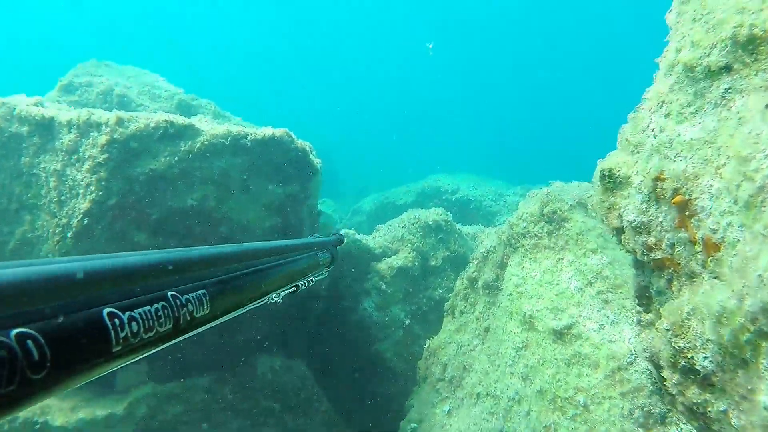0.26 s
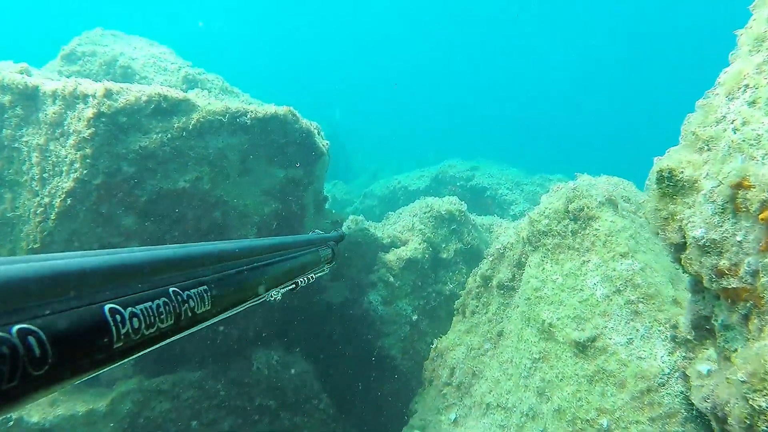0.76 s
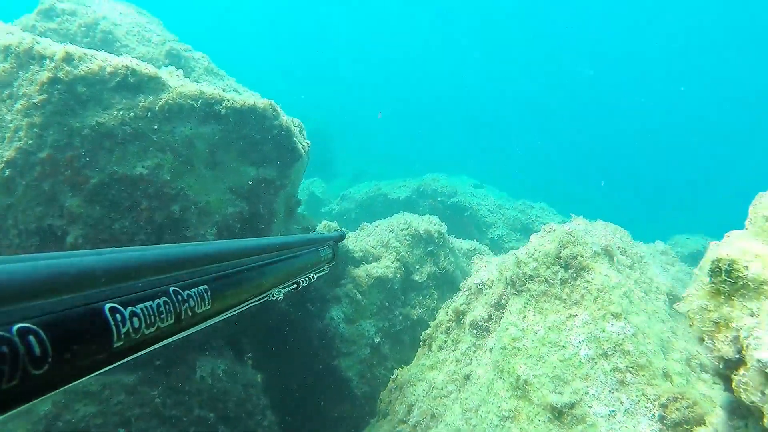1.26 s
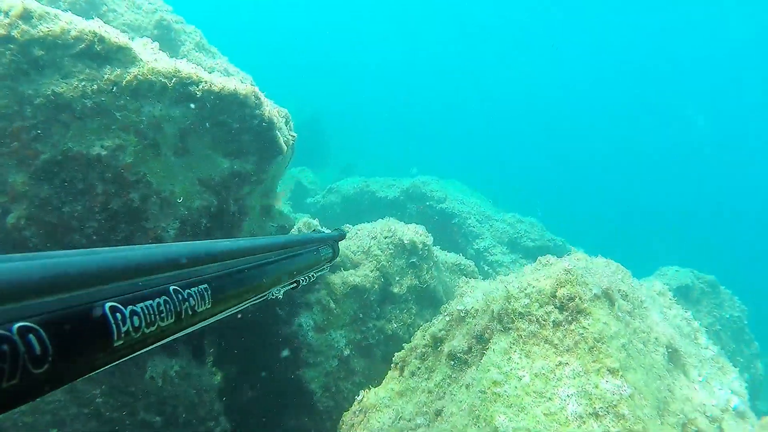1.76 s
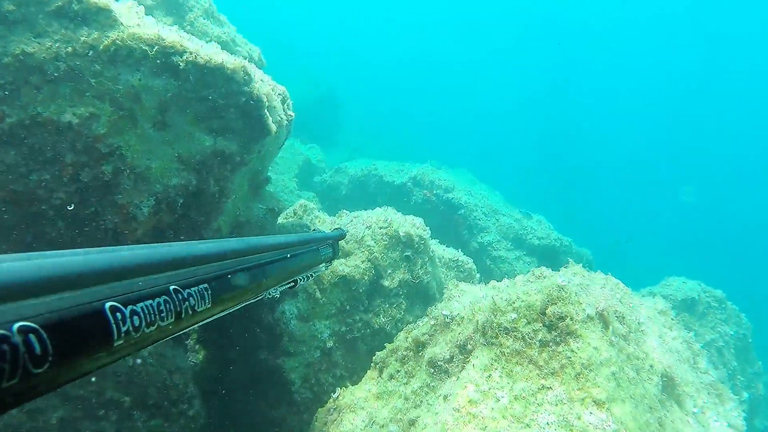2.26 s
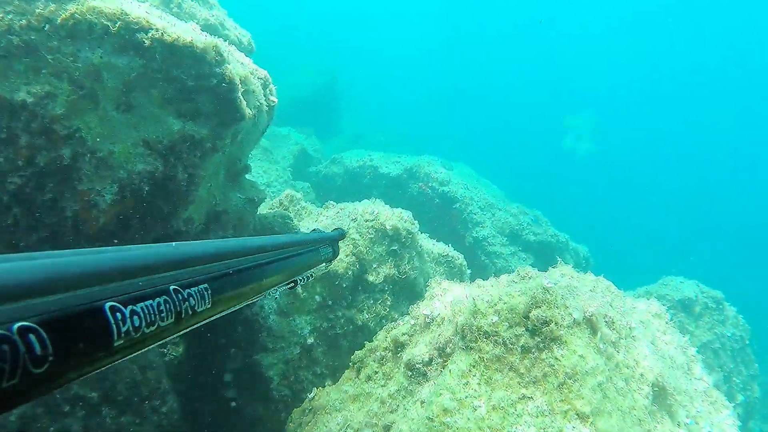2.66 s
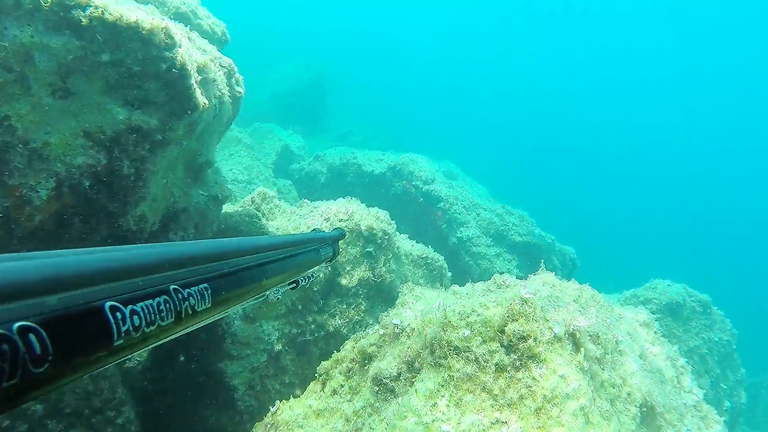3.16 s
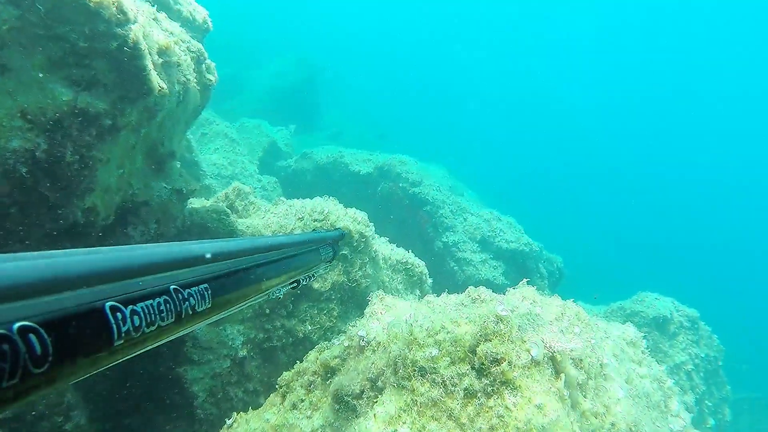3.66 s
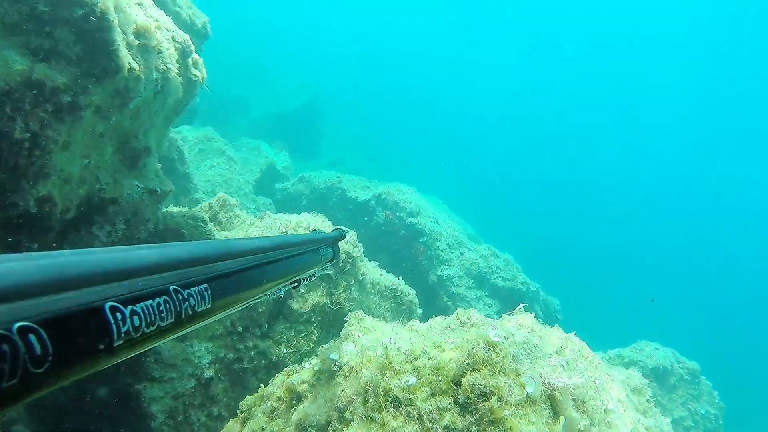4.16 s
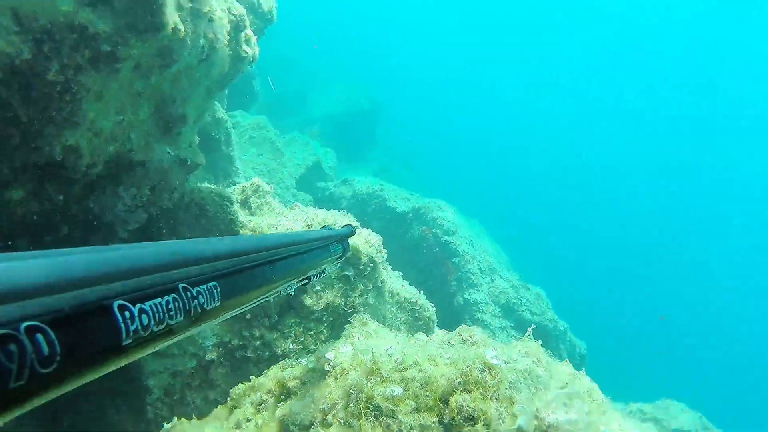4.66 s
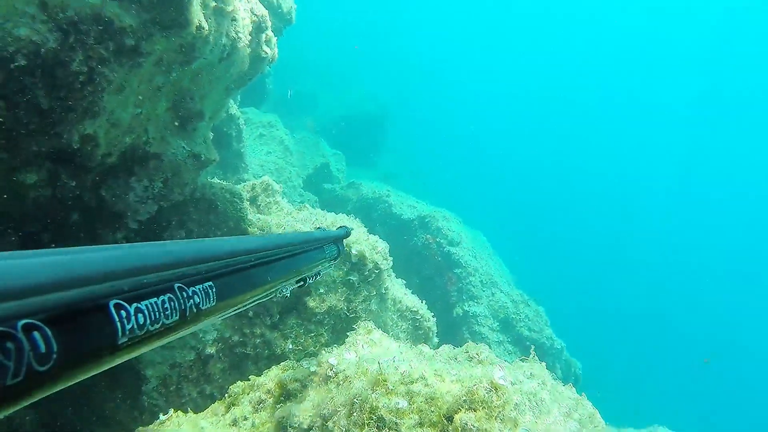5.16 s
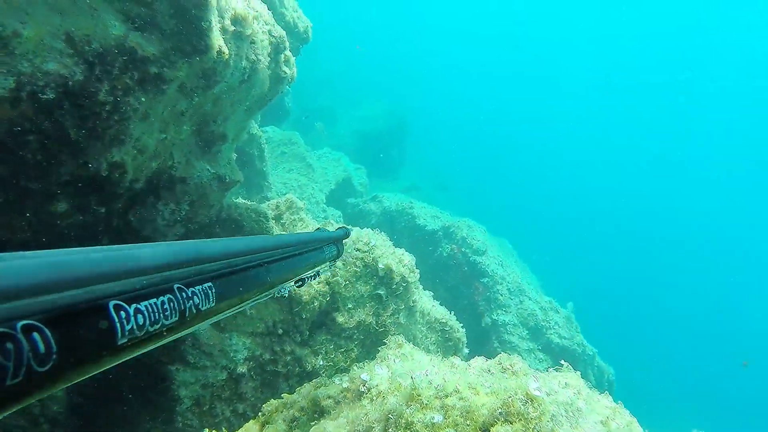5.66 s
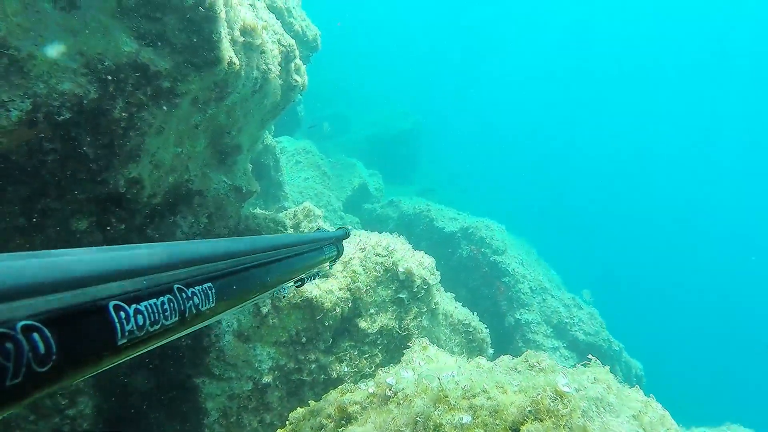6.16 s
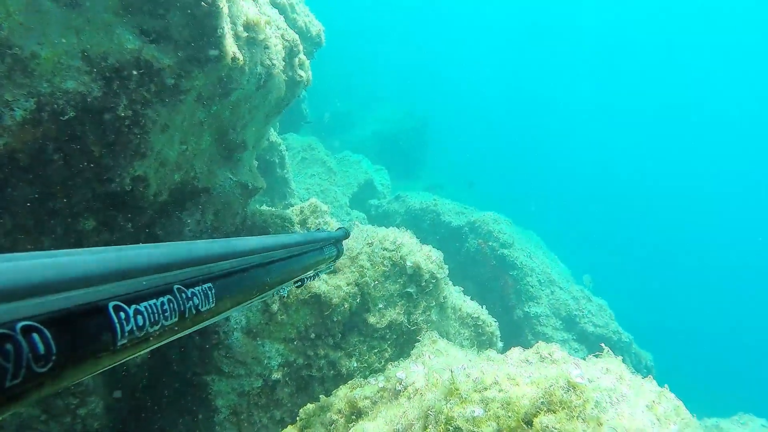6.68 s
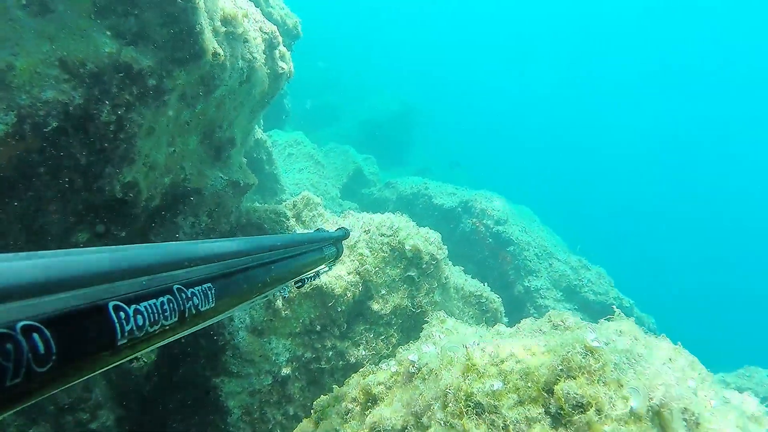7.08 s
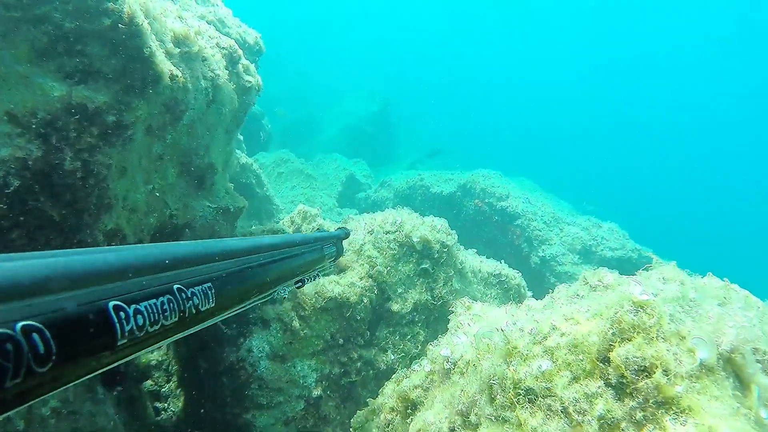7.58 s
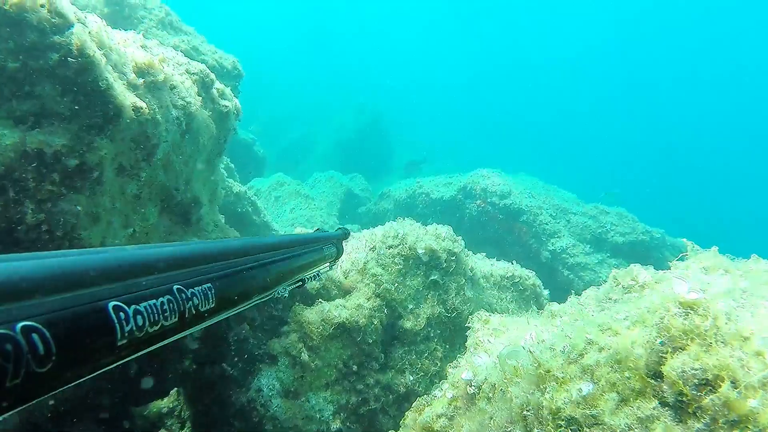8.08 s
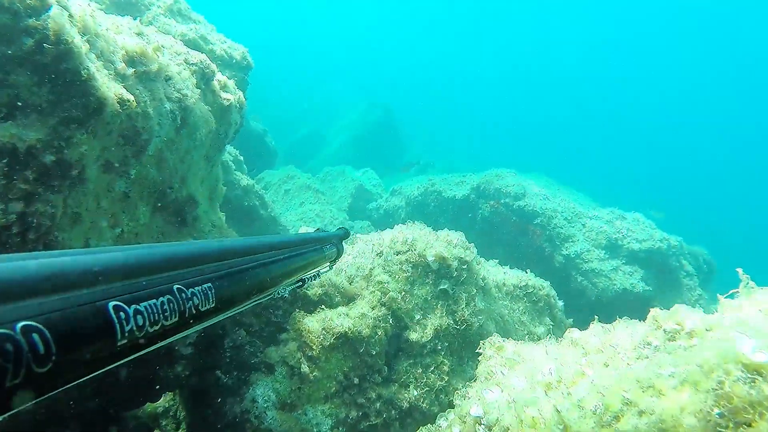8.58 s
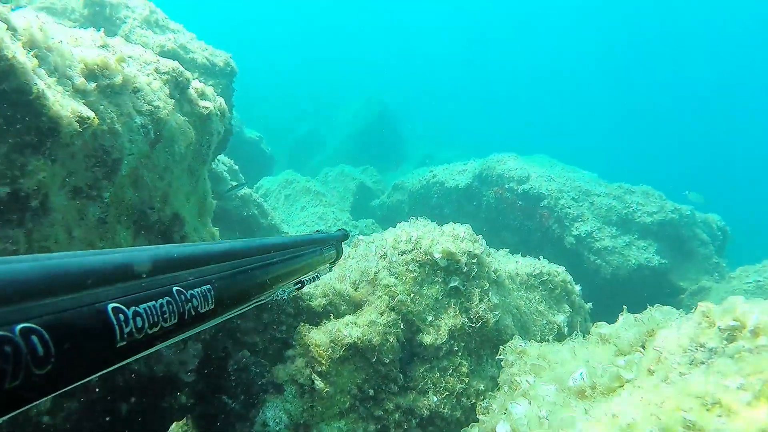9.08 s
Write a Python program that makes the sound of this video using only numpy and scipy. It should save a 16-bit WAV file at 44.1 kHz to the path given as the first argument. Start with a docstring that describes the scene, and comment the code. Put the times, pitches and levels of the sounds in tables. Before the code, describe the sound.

The sound is close and boxy, from a camera sealed in a housing underwater among rocks. A quiet, low, slightly wavering hum and soft background noise run throughout, beneath the continuous fine frying of distant shrimp. From 0.2 to 0.9 seconds, gear taps and rubs the case, a low surge of water swells at about 0.3, and faint bubbles flurry. A very loud, dry shrimp snap cracks at 1.3. Smaller snaps scatter irregularly onward, with little bubble gulps around 0.9 to 1.8, 2.5 and 3.2 to 3.9. A gentle rumble and faint rub come near 4. At 4.75 a heavy bump hits, followed at 4.83 by another with a gritty scratch, leaving a brief deep wobble. From 5 to 9.3 crackle and sharp snaps continue, with round bubble blips near 6.2 and 7.4, very faint taps after 7.6, and the hum's upper tones weakening.

```python
"""Under water among rocks, heard from inside a diver's sealed camera housing.
Snapping shrimp crackle near and far: each snap is a spike with scatter and echoes, coloured by the case.
The camera hums as a few wavering sines, water rumbles as swelling noise and small bubbles ring.
The diver's gear taps and rubs on the housing, exciting its modes; later two heavy bumps sway the camera."""
import sys
import numpy as np
from scipy import signal
from scipy.fft import rfft, irfft, next_fast_len
from scipy.io import wavfile
from scipy.ndimage import map_coordinates

SR = 44100
rng = np.random.default_rng(int(sys.argv[2]) if len(sys.argv) > 2 else 0)


def persist_wave(psi):
    """Save psi, clipped to +-1, as 16-bit WAV."""
    counts = np.round(np.clip(psi, -1, 1) * 32767).astype(np.int16)
    wavfile.write(sys.argv[1], SR, np.atleast_2d(counts).T)


N = 411453


def amp(db):
    """Amplitude factor of a level in dB."""
    return 10 ** (np.asarray(db) / 20)


def unit(x):
    """x scaled to rms 1."""
    return x / np.sqrt(np.mean(x ** 2) + 1e-20)


def along(points, hz):
    """Values at hz, interpolated between (Hz, value) points on a log axis."""
    f, v = np.transpose(points)
    return np.interp(np.log(hz + 1), np.log(f + 1), v)


def curve(rows):
    """One value per sample from (seconds, value) rows."""
    return np.interp(np.arange(N) / SR, *np.transpose(rows))


def wobble(rate):
    """A smooth random curve, rate knots a second."""
    knots = rng.standard_normal(int(N * rate / SR) + 4)
    return map_coordinates(knots, [np.arange(N) * rate / SR])


def filtered(x, response):
    """x with its spectrum multiplied by a response of frequency."""
    size = next_fast_len(len(x) + SR // 10)
    hz = np.fft.rfftfreq(size, 1 / SR)
    return irfft(rfft(x, size) * response(hz), size)[:len(x)]


def noise(spectrum):
    """Coloured noise of rms 1."""
    return unit(filtered(rng.standard_normal(N), lambda hz: amp(along(spectrum, hz))))


def add(track, s, sound):
    """Mix a sound into the track at s seconds."""
    part = track[max(round(s * SR), 0):][:len(sound)]
    part += sound[:len(part)]


def ticks(rate, spread_db, limit_db):
    """Random impulses, rate a second: many weak ones, few strong, those over the limit left out."""
    size_db = spread_db * rng.exponential(size=N)
    present = (rng.random(N) < rate / SR) * (size_db < limit_db)
    return present * amp(size_db) * rng.choice([-1, 1], N)


def gestures(rows, rise_db_per_s, fall_db_per_s, rest_db=-120):
    """Gain of (start, length, dB) gestures that rise ahead of the start, hold and fall, over a resting level."""
    t = np.arange(N) / SR
    power = amp(rest_db) ** 2
    for s, length, db in rows:
        before, after = np.maximum(s - t, 0), np.maximum(t - s - length, 0)
        power = power + amp(db - rise_db_per_s * before - fall_db_per_s * after) ** 2
    return np.sqrt(power)


def water(calm_db=-56.5, push_db_per_s=124, settle_db_per_s=35, floor_db=-54):
    """Rumbling noise that swells as the diver's movements push water on the housing, over steady noise."""
    # Each row: start in seconds, length in seconds, rumble level in dB.
    moves = [(0, .08, -42.5), (.27, 0.055, -28), (1.1, .1, -49), (2.17, 0.14, -48), (4.05, 0.24, -44.5),
             (4.68, .06, -38.5), (6.42, .06, -51.5), (7.28, .06, -56)]
    # Spectrum of the rumble against the housing. Each row: frequency in Hz, relative level in dB per Hz.
    rumble = [(8, -11), (20, 4), (36, -11), (55, -5), (80, -25), (200, -31), (500, -44), (1500, -92)]
    # Spectrum of the steady background. Each row: frequency in Hz, relative level in dB per Hz.
    background = [(20, 2), (60, -2.5), (110, 0.5), (170, -5.5), (260, -1.5), (340, -8), (520, -11),
                  (780, -12.5), (1200, -20), (2600, -29.5), (5000, -23), (9000, -29.5), (15000, -33.5)]
    swell = gestures(moves, push_db_per_s, settle_db_per_s, calm_db)
    return swell * noise(rumble) + amp(floor_db) * noise(background)


def hum(waver_db=0.5, drift_radians=0.12):
    """The camera's hum: sine lines, each wavering a little in level and phase."""
    # Lines of the hum, the lowest first. Each row: frequency in Hz, rms level in dB before the changes below.
    lines = [(111.7, -55), (195.5, -82), (223.4, -58), (249.4, -58), (275.4, -58.5), (446.6, -80),
             (13906, -94)]
    # Level change shared by all but the lowest line. Each row: time in seconds, change in dB.
    overtones = [(0, 0.5), (4.5, 1.7), (6, -2), (7.5, -5), (9.3, -2)]
    t, upper_db = np.arange(N) / SR, curve(overtones)
    out = np.zeros(N)
    for k, (hz, db) in enumerate(lines):
        level_db = db + (k > 0) * upper_db + waver_db * wobble(2.08)
        phase = 2 * np.pi * (hz * t + rng.random()) + drift_radians * wobble(2.68)
        out += np.sqrt(2) * amp(level_db) * np.sin(phase)
    return out


def case_response(size=4096):
    """What a pressure spike in the water becomes inside the case: a causal colour plus wall resonances."""
    # Colour of a snap through the case. Each row: frequency in Hz, relative level in dB.
    colour = [(200, -39), (500, -16), (800, -5), (1250, -14), (1900, -10.5), (2600, 0), (3400, -5.5),
              (4200, -6), (4650, -11), (5700, -14), (8500, -20.5), (9800, -21), (11300, -29), (12400, -25),
              (15000, -39.5)]
    # Narrow rings of the case wall. Each row: frequency in Hz, width in Hz, level in dB against the colour there.
    wall = [(1537, 69, 11.5), (5057, 150, 3.5), (2084, 125, -8.5)]
    hz = np.fft.rfftfreq(size, 1 / SR)
    # folding the cepstrum puts the energy as early as the colour allows
    cepstrum = irfft(np.log(amp(along(colour, hz))))
    causal = np.exp(rfft(2 * cepstrum[:size // 2], size))
    rings = sum(amp(db) * 1j * hz * width / (centre ** 2 - hz ** 2 + 1j * hz * width)
                for centre, width, db in wall)
    return irfft(causal * (1 + rings))[:size // 2]


def snap(case, treble_db, centre_hz, focus_db, rocks_db, scatter_db=0, rocks_t60=0.059, scatter_t60=0.0051,
         surface_db=-13, shelf_hz=5000, dull_hz=7000, focus_octaves=0.39):
    """A collapsing bubble: a spike, scatter close by, dull rock echoes and an inverted copy from the surface."""
    t = np.arange(len(case)) / SR
    scatter = rng.standard_normal(len(t)) * amp(-60 * t / scatter_t60) * (1 - np.exp(-t / 0.00042))
    rocks = rng.standard_normal(len(t)) ** 3 * amp(-60 * t / rocks_t60)  # cubed: a few echoes stand out
    direct = amp(scatter_db) * scatter / np.linalg.norm(scatter)
    direct[0] += 1
    direct[round(rng.uniform(.004, .018) * SR)] -= amp(surface_db)
    size = 2 * len(case)
    hz = np.fft.rfftfreq(size, 1 / SR)
    echoes = amp(rocks_db) * rfft(rocks / np.linalg.norm(rocks), size) / (1 + 1j * hz / dull_hz)
    # the claw and its crevice favour one band
    focus = np.exp(-.5 * (np.log2((hz + 1) / centre_hz) / focus_octaves) ** 2)
    treble_shelf = hz ** 4 / (hz ** 4 + shelf_hz ** 4)
    colour = amp(focus_db * focus + treble_db * treble_shelf)
    sound = irfft((rfft(direct, size) + echoes) * rfft(case, size) * colour)
    sound = np.roll(sound, SR // 1000)  # 1 ms later
    return sound / np.abs(sound).max()


def ticking(case, centre_hz, range_octaves, treble_db, spread_db, limit_db, count):
    """Shrimp in the middle distance, rms 1: separate snaps, each in a band of its own."""
    out = np.zeros(N)
    for when, size, band in rng.random((count, 3)):
        hz = centre_hz * 2 ** (range_octaves * (band - .5))
        db = min(-spread_db * np.log(1 - size), limit_db)
        add(out, when * N / SR, amp(db) * snap(case, treble_db, hz, focus_db=14, rocks_db=3.0))
    return unit(out)


def colony(case, rate=900, count=8):
    """Frying sound, rms 1: dense impulses from far patches of rock, each patch with its own echoes."""
    frying = np.zeros(N)
    for _ in range(count):
        impulses = ticks(rate / count, 3.7, 15)
        patch = unit(snap(case, -12.5, 2400, focus_db=5, rocks_db=8))
        frying += signal.oaconvolve(impulses, patch)[:N]
    return unit(frying)


def far_shrimp(case, lull_db=-55, volley_db_per_s=66):
    """Dull ticks of large shrimp and sharp ones of small shrimp over the frying of the far colony."""
    # Spells of louder crackle. Each row: start in seconds, length in seconds, gain in dB on the mix below.
    volleys = [(0, 0.41, -53), (.8, 0.084, -59.5), (1.25, 0.2, -56), (1.72, 0.065, -53), (2.42, 0.12, -56),
               (3.42, 0.47, -53), (4.25, 0.051, -53.5), (5.62, .15, -53), (6.4, 0.074, -54),
               (7.3, 0.14, -56.5), (8.35, 0.16, -58.5)]
    large = ticking(case, centre_hz=2810, range_octaves=1.5, treble_db=12.5, spread_db=5, limit_db=12, count=380)
    small = ticking(case, centre_hz=11500, range_octaves=1.42, treble_db=16.5, spread_db=5, limit_db=15, count=480)
    frying = colony(case) * amp(1.66 * wobble(17))
    mix = amp(-2) * large + amp(-10) * small + amp(-2.5) * frying
    return gestures(volleys, volley_db_per_s, volley_db_per_s, lull_db) * mix


def bubble(hz, cycles=6, rise=0.1):
    """A bubble rings, 30 dB down after the given cycles, its pitch creeping up."""
    t = np.arange(SR // 10) / SR
    age = t * hz / cycles
    ring = np.sin(2 * np.pi * hz * t * (1 + rise * age / 2))
    return amp(-60 * age / 2) * (1 - np.exp(-t * hz)) * ring


def bubbling(level_db=1, faint_hz=740, size_db=9, count=650, stray_db=-58, flurry_db_per_s=136):
    """A few clear gulps of water among many faint ringing bubbles that swell in flurries."""
    # Small bubbles and gulps. Each row: start in seconds, level in dB before level_db, starting pitch in Hz.
    clear = [(0.903, -34.5, 910), (1.119, -32.5, 810), (1.723, -36, 860), (1.823, -35, 770),
             (2.484, -42, 850), (3.204, -38, 690), (3.395, -37.5, 710), (3.881, -37, 450), (6.14, -38, 460),
             (6.31, -39, 600), (7.407, -36, 610), (7.455, -35, 810)]
    # Flurries of faint bubbles. Each row: start in seconds, length in seconds, gain in dB on the faint bubbles.
    flurries = [(.35, 0.073, -40), (3.8, 0.11, -47.5)]
    gulps, faint = np.zeros(N), np.zeros(N)
    for s, db, hz in clear:
        add(gulps, s, amp(db + level_db) * bubble(hz))
    for when, size, pitch in rng.random((count, 3)):
        hz = faint_hz * 2 ** (1.5 * (pitch - .5))
        add(faint, when * N / SR, amp(size_db * size ** 2) * bubble(hz, cycles=13))
    return gulps + gestures(flurries, flurry_db_per_s, flurry_db_per_s, stray_db) * faint


def near_shrimp(case, plain_treble_db=-22, wet_db=4, usual_db=-28, nearness=0.58):
    """Single loud snaps, each with its own colour; the louder, the nearer and drier."""
    # The nearest shrimp. Each row: start in seconds, peak in dB, treble in dB on a scale where
    # plain_treble_db leaves it as it is, favoured frequency in Hz.
    snaps = [(0.0592, -32, -20, 2850), (0.1056, -30.5, -18, 2540), (0.661, -29, -14, 2330),
             (0.822, -21, -27, 2780), (0.9817, -30.5, -22, 2560), (1.0499, -27, -21, 2570),
             (1.1445, -29, -43, 2790), (1.3315, -9.5, -13.5, 2220), (1.381, -31.5, -17, 2680),
             (1.5482, -29.5, -5, 2770), (1.602, -30, -16, 2540), (1.976, -28.5, -13, 2600),
             (2.2144, -26.5, -17, 3270), (2.24, -29.5, -3, 2800), (2.254, -22, -29, 2580),
             (2.472, -27.5, -22, 3730), (2.54, -29.5, -18, 3480), (2.6357, -21, 0.5, 2600),
             (2.917, -31.5, -10, 2550), (3.4665, -29, -8, 2600), (3.505, -31.5, -5, 3120),
             (3.5507, -23, -13, 2790), (3.644, -24.5, -5, 2500), (3.871, -27.5, -7, 2830),
             (4.149, -29, -1, 2800), (4.349, -23, -17, 3070), (4.5348, -26, -14, 2540),
             (4.9573, -30.5, 3, 2840), (5.135, -25, -28, 2660), (5.2006, -27, -9, 2260),
             (5.214, -23.5, -17, 2570), (5.339, -29.5, -7, 2580), (5.695, -28.5, -28, 2470),
             (5.9606, -29.5, -11, 2680), (6.1877, -25, -5, 2680), (6.2978, -26, -12, 2900),
             (6.398, -28, -18, 3660), (6.498, -24, -2, 2580), (6.5934, -27, 15, 3660),
             (6.6466, -22.5, -15, 2670), (6.774, -30.5, -8, 2590), (7.0626, -22, -25, 2100),
             (7.0983, -23.5, -25, 2880), (7.114, -29.5, -30, 2370), (7.1395, -27, -5, 3870),
             (7.3381, -32, -14, 2300), (7.454, -36, -13, 2540), (7.522, -26.5, -6, 3860),
             (8.1194, -25.5, -4, 2650), (8.3269, -29, -14, 2470), (8.521, -32, -36, 2650),
             (8.5547, -29, -8, 2640), (8.6857, -27, -17, 2590), (8.799, -23, -15, 2960),
             (9.192, -30.5, -33, 2420)]
    out = np.zeros(N)
    for s, db, treble_db, hz in snaps:
        rocks_db = wet_db - nearness * (db - usual_db)
        add(out, s, amp(db) * snap(case, treble_db - plain_treble_db, hz, focus_db=9, rocks_db=rocks_db))
    return out


def housing_ring(tilt_db, damping, vary_db=0.95, pivot_hz=850, swell_s=0.00049):
    """The housing's modes: a harder contact tilts them upward by tilt_db an octave, a lingering one damps them."""
    # Modes of the housing. Each row: frequency in Hz, level in dB before tilt and chance,
    # undamped time in seconds to fall 60 dB.
    housing = [(219, -29, 0.055), (295.5, -6.5, 0.14), (389, 4, 0.05), (809, 1, 0.035), (870, 3.5, 0.029),
               (1035, -9.5, 0.04), (1440, -8, 0.018), (1530, 5, 0.013), (1900, -13, 0.037),
               (2450, -13.5, 0.034)]
    t = np.arange(SR // 8) / SR
    modes = np.zeros(len(t))
    for hz, db, t60 in housing:
        level_db = db + tilt_db * np.log2(hz / pivot_hz) + vary_db * rng.standard_normal()
        modes += amp(level_db - 60 * damping * t / t60) * np.sin(2 * np.pi * hz * t)
    return modes * (1 - np.exp(-t / swell_s))


def knocks(level_db=-1, plain_db=-15, hardness=0.25, scuff_db=5, firm_db=-19, chatter_t60=0.07,
           touch_s=0.004014, light_db=-25, heavy_db=-9, scuff_damping=2.0, soft_hz=3200):
    """Gear strikes the housing: light contacts scuff and chatter, firm ones let it ring."""
    # Gear touching the housing. Each row: time in seconds, peak in dB before level_db and the soft_hz
    # filter, hardness in dB on a scale where plain_db leaves the modes untilted.
    contacts = [(0.198, -24.5, 2), (0.22, -36.5, -15), (0.326, -32, -37), (0.441, -35, -2),
                (0.53, -27.5, -10), (0.558, -26, -6), (0.597, -23, 2), (0.633, -29, -22), (0.649, -24, -2),
                (0.757, -33, 2), (0.863, -37, -6), (2.045, -38.5, -12), (2.764, -34, 22), (4.752, -6, -13),
                (4.831, -19.5, 11), (4.835, -11.5, -16), (7.609, -42.5, 2), (7.881, -40, -1),
                (8.403, -41, 3)]
    out, t = np.zeros(N), np.arange(SR // 20) / SR
    for s, db, hard_db in contacts:
        light = np.interp(db, [light_db, heavy_db], [1, 0])
        # the scuff builds up ahead of the blow itself
        force = rng.standard_normal(len(t)) * np.minimum(t / touch_s, 1) * amp(-60 * t / chatter_t60)
        force *= amp(light * scuff_db + (1 - light) * firm_db) / np.linalg.norm(force)
        force[round(touch_s * SR)] += 1
        ring = housing_ring(hardness * (hard_db - plain_db), 1 + light * scuff_damping)
        sound = signal.fftconvolve(force, ring)
        add(out, s - 0.707 * touch_s, amp(db + level_db) * sound / np.abs(sound).max())
    return filtered(out, lambda hz: 1 / (1 + (hz / soft_hz) ** 6))


def rubbing(slip_hz=2400, uneven_db=3, grip_db_per_s=400, lift_db_per_s=190):
    """Tiny slips of the sliding gear, at uneven pressure, excite the damped housing."""
    # Gear sliding on the housing. Each row: start in seconds, length in seconds, level in dB before unevenness.
    slides = [(.205, 0.012, -48), (.33, 0.068, -45), (.525, 0.077, -48.5), (.89, 0.23, -57.5),
              (3.8, 0.11, -57.5)]
    slips = ticks(500, 4, 12)
    rasp = signal.oaconvolve(slips, housing_ring(tilt_db=-0.5, damping=2.7))[:N]
    pressure = gestures(slides, grip_db_per_s, lift_db_per_s) * amp(uneven_db * wobble(37.0))
    return pressure * unit(filtered(rasp, lambda hz: 1 / (1 + (hz / slip_hz) ** 6)))


def bumps(scratch_hz=3600, scratch_octaves=0.18, scratch_t60=0.0062, scratch_rise=0.0038):
    """A heavy bump scratches the case with a burst of narrow noise and sets the camera swaying."""
    # Heavy bumps. Each row: start in seconds, push gain in dB, push length in seconds, scratch gain in dB.
    heavy = [(4.759, -21, 0.0082, -44), (4.832, -20, 0.0096, -10.5)]
    # The camera sways on its mount. Each row: frequency in Hz, relative level in dB, seconds to fall 60 dB.
    mount = [(28.4, 0, 0.47), (42.4, 4.5, 0.29), (75.4, 0.5, 0.3)]
    out, t = np.zeros(N), np.arange(SR // 2) / SR
    sway = sum(amp(db - 60 * t / t60) * np.sin(2 * np.pi * hz * t) for hz, db, t60 in mount)
    # the scratch builds up with the pressure, then dies
    stroke = np.minimum(t / scratch_rise, 1) ** 2 * amp(-60 * np.maximum(t - scratch_rise, 0) / scratch_t60)

    def scratch_band(hz):
        return np.exp(-.5 * (np.log2((hz + 1) / scratch_hz) / scratch_octaves) ** 2)

    for s, db, length, scratch_db in heavy:
        push = np.sin(np.pi * np.minimum(t / length, 1)) ** 2
        add(out, s, amp(db) * signal.fftconvolve(sway, push / push.sum()))
        grit = filtered(rng.standard_normal(len(t)), scratch_band)
        add(out, s, amp(scratch_db) * stroke * grit / np.abs(grit).max())
    return out


def scene():
    """All the sources as they sound inside the housing, in one channel."""
    case = case_response()
    shrimp = far_shrimp(case) + near_shrimp(case)
    gear = knocks() + rubbing() + bumps()
    return (water() + hum() + shrimp + bubbling() + gear)[None]


def record(dry, top_hz=15200):
    """The camera's band limit: a very steep low-pass."""
    return np.array([filtered(x, lambda hz: 1 / np.sqrt(1 + (hz / top_hz) ** 120)) for x in dry])


dry = scene()
out = record(dry)
persist_wave(out)
```